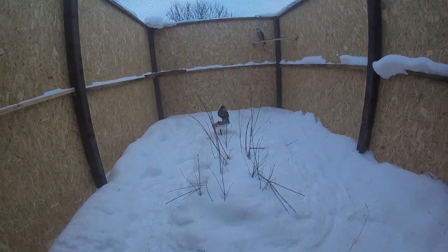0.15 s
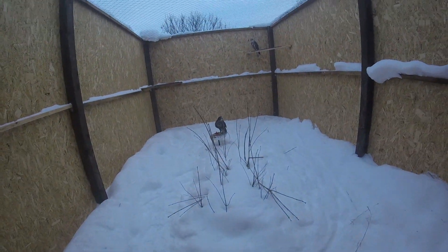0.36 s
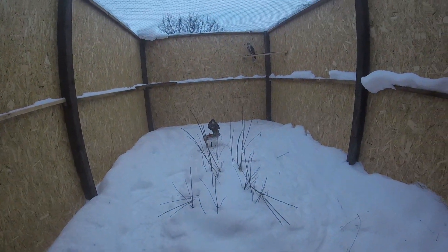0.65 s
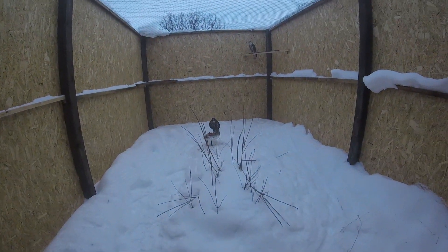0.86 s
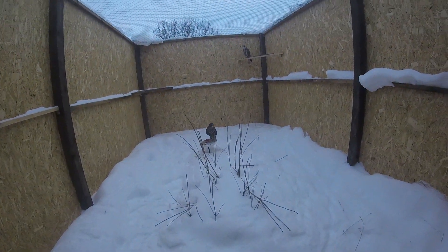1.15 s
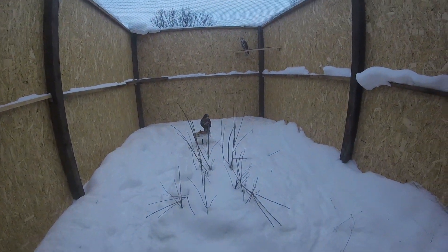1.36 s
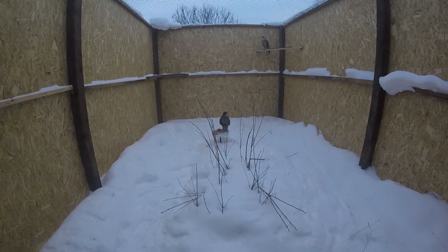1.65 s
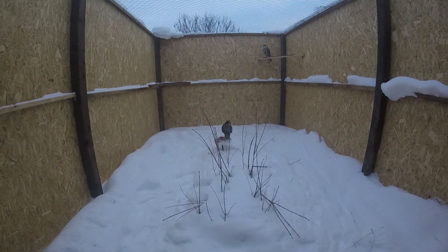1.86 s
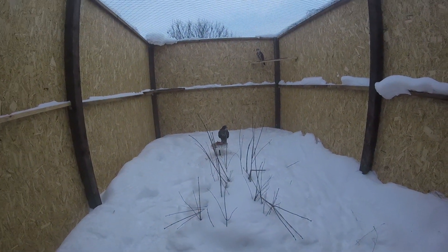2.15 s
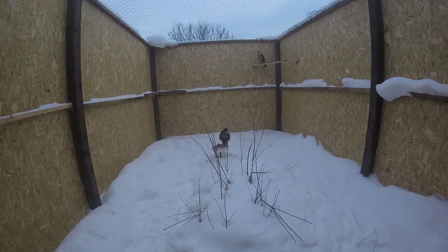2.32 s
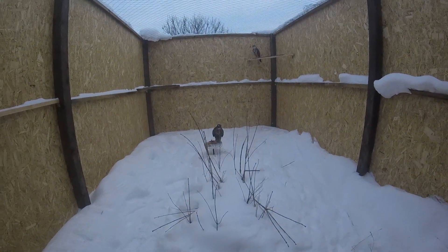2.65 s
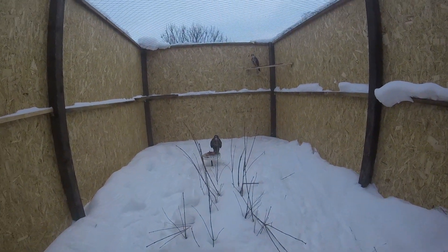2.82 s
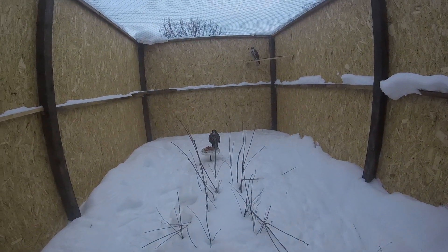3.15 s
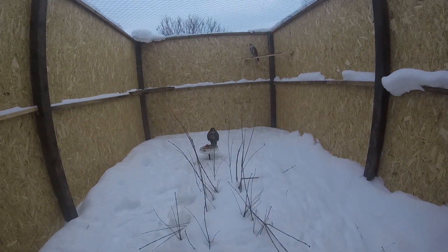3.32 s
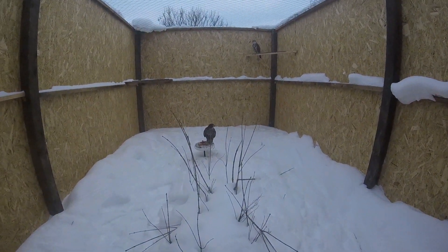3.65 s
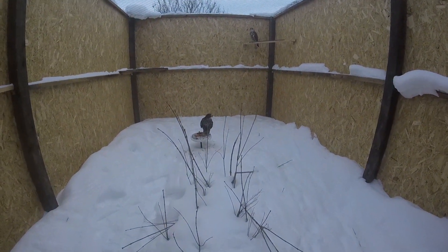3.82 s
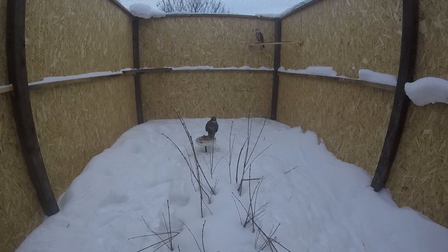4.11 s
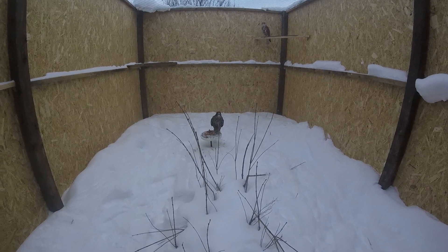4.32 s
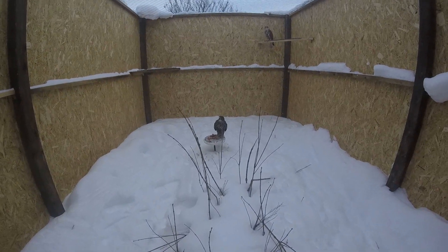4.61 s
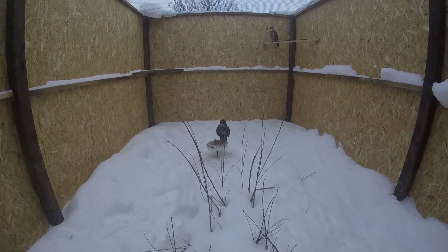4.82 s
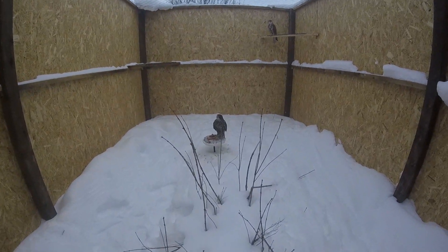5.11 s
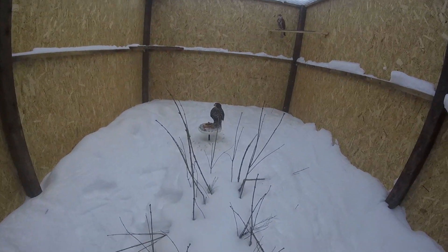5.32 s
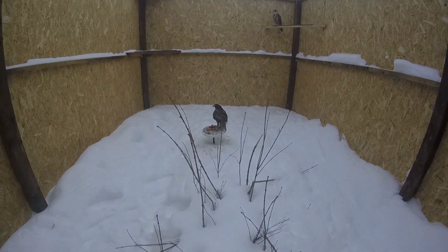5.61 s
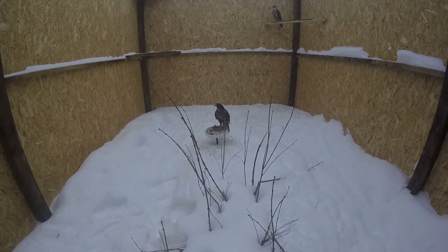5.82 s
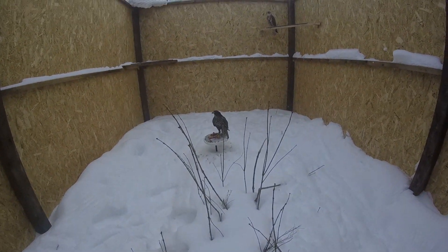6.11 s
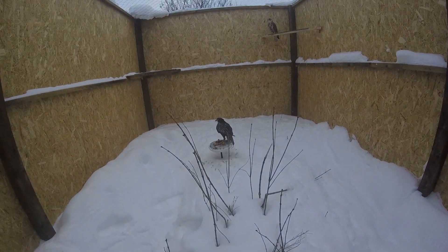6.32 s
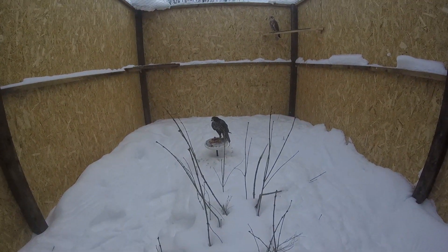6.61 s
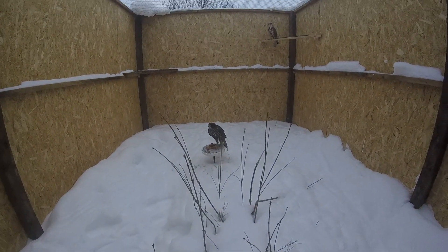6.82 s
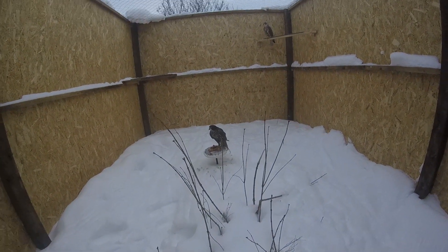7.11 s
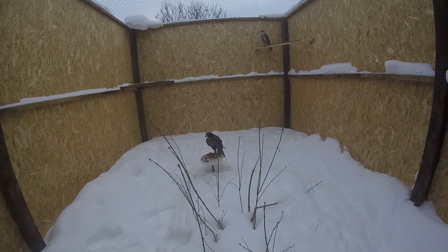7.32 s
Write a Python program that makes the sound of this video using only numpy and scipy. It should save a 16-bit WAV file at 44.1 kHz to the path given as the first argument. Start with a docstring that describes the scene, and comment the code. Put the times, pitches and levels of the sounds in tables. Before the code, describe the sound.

Hoarse, repeated falcon cries ring between wooden walls, then stop, leaving soft bumps and a few door clicks in quiet air.

```python
"""Falcon in a snowy aviary.

A falcon scolds between board walls under an open roof. Each call starts as a rising rasp, ragged
pulses of the syrinx through an opening beak, and breaks into a hoarse, arched cry; the walls ring
after it. Soft bumps and rustles sound close by, and at the end a door clicks over quiet winter air."""
import sys
import numpy as np
from scipy import signal
from scipy.fft import rfft, irfft, next_fast_len
from scipy.io import wavfile
from scipy.ndimage import map_coordinates

SR = 44100
rng = np.random.default_rng(int(sys.argv[2]) if len(sys.argv) > 2 else 0)


def to_wav(sig):
    """Store sig (one row per channel, or 1-D mono) as 16-bit WAV at the path in sys.argv[1].

    Samples outside -1..1 are clipped; the rate is SR.
    """
    pcm = np.clip(np.atleast_2d(sig), -1, 1) * 32767
    pcm = np.round(pcm).astype(np.int16)
    wavfile.write(sys.argv[1], SR, pcm.T)  # frames by channels


N = 329426


def amp(db):
    """Decibels to gain."""
    return 10 ** (np.asarray(db) / 20)


def unit(x):
    """Scale to rms 1."""
    return x / np.sqrt(np.mean(x ** 2) + 1e-20)


def along(points, hz):
    """Read (Hz, value) points on a log frequency axis."""
    knots_hz, values = np.transpose(points)
    return np.interp(np.log(hz + 1), np.log(knots_hz + 1), values)


def filtered(x, spectrum):
    """Filter x by a curve of (Hz, dB) points."""
    size = next_fast_len(len(x) + 4096)
    gain = amp(along(spectrum, np.fft.rfftfreq(size, 1 / SR)))
    return irfft(rfft(x, size) * gain, size)[:len(x)]


def coloured(x, spectrum):
    """Filter, then scale to rms 1."""
    return unit(filtered(x, spectrum))


def noise(n, spectrum):
    """Coloured noise of rms 1."""
    return coloured(rng.standard_normal(n), spectrum)


def wobble(n, rate_hz):
    """Smooth random curve with rate_hz knots a second."""
    knots = rng.standard_normal(int(n * rate_hz / SR) + 4)
    return map_coordinates(knots, [np.arange(n) * rate_hz / SR])


def add(track, start_s, x):
    """Mix x into the track, cut to fit."""
    i = round(start_s * SR)
    x = x[max(-i, 0):max(N - i, 0)]
    track[max(i, 0):][:len(x)] += x


def gate(t, start_s, end_s, rise_s, fall_s):
    """Smooth on-off envelope."""
    return (1 + np.tanh((t - start_s) / rise_s)) * (1 - np.tanh((t - end_s) / fall_s)) / 4


def burst(spectrum, rise_s, t60_s):
    """A short contact: noise that swells and dies, envelope peak 1."""
    t = np.arange(SR // 5) / SR
    envelope = (1 - np.exp(-t / rise_s)) ** 2 * amp(-60 * t / t60_s)
    return noise(len(t), spectrum) * envelope / envelope.max()


# Outdoor air spectrum. Each row: frequency in Hz, relative density in dB.
AIR_SPECTRUM = [(20, -1.5), (64, -6), (110, -3.5), (230, -9.5), (450, -13), (800, -20.5), (2000, -24),
                (5000, -31.5), (9000, -38), (15000, -47.5)]


def winter_air(level_db=-55.5, drift_db=1.5):
    """Still air with a faint, far rumble."""
    return amp(level_db + drift_db * wobble(N, 13)) * noise(N, AIR_SPECTRUM)


# Rubbing spectrum. Each row: frequency in Hz, relative density in dB.
RUSTLE_SPECTRUM = [(60, -11.5), (160, 1.5), (430, 0.5), (850, -14), (1800, -11.5), (3500, -20),
                   (6200, -22.5), (10000, -32), (15000, -45.5)]
# Spells of rustling. Each row: start in seconds, length in seconds, level in dB.
RUSTLE_SPELLS = [(2.393, 0.62, -49), (3.54, 1.25, -50.5), (6.6, 0.23, -57), (6.984, 0.22, -52)]


def rustle(grain_db=3, rise_s=0.027, settle_s=0.12):
    """Grainy rubbing close by: each spell rises, holds while the movement lasts and settles."""
    t = np.arange(N) / SR
    level = np.zeros(N)
    for start_s, length_s, db in RUSTLE_SPELLS:
        rise = 1 - np.exp(-np.maximum(t - start_s, 0) / rise_s)
        settle = np.exp(-np.maximum(t - start_s - length_s, 0) / settle_s)
        level = np.maximum(level, amp(db) * rise * settle)
    return level * unit(noise(N, RUSTLE_SPECTRUM) * amp(grain_db * wobble(N, 130)))


# Knock spectrum. Each row: frequency in Hz, relative density in dB.
BUMP_SPECTRUM = [(30, -24), (110, -5), (200, 0.5), (520, -1), (850, -17), (2000, -23), (8000, -34),
                 (15000, -59)]
# Knocks. Each row: time in seconds, relative level in dB.
BUMP_HITS = [(0.383, -31), (2.853, -29.5), (3.198, -30.5), (3.594, -28), (3.700, -21.5), (4.688, -36),
             (4.748, -32.5), (5.859, -42), (6.473, -36), (6.614, -35), (6.692, -39), (6.729, -38),
             (6.776, -34.5), (6.984, -33.5), (7.019, -38), (7.076, -34.5), (7.191, -33.5), (7.214, -35)]


def bumps(gain_db=-8.5):
    """Soft, low knocks close by."""
    track = np.zeros(N)
    for time_s, db in BUMP_HITS:
        add(track, time_s - 0.007, amp(db + gain_db) * burst(BUMP_SPECTRUM, rise_s=0.017, t60_s=0.086))
    return track


# Click and scrape spectra. Each row: frequency in Hz, relative density in dB.
CLICK_SPECTRUM = [(150, -4), (300, -10), (1000, -11), (1900, 2.5), (3100, -10.5), (3700, -9), (5400, -24),
                  (8000, -29.5), (14000, -57.5)]
SCRAPE_SPECTRUM = [(800, -14), (2000, -4), (6500, 2), (10000, -12.5), (15000, -25.5)]
# Door clicks. Each row: time in seconds, relative level in dB.
DOOR_CLICKS = [(5.8605, -50), (6.3884, -50), (6.4733, -44.5), (6.6103, -40), (6.6238, -27.5), (6.6682, -48),
               (6.699, -41), (6.7307, -41), (6.7768, -39), (6.8441, -26), (7.0772, -50), (7.1953, -40.5)]


def door(click_gain_db=-9.0, scrape_gain_db=-18, scrape_limit_db=-58.5):
    """Woody clicks, each with a bright scrape that grows with the blow up to a limit."""
    track = np.zeros(N)
    for time_s, db in DOOR_CLICKS:
        click = burst(CLICK_SPECTRUM, rise_s=0.0078, t60_s=0.027)
        scrape = burst(SCRAPE_SPECTRUM, rise_s=0.008, t60_s=0.051)
        add(track, time_s - 0.004, amp(db + click_gain_db) * click)
        add(track, time_s - 0.006, amp(min(db + scrape_gain_db, scrape_limit_db)) * scrape)
    return track


# Aviary decay. Each row: frequency in Hz, T60 in seconds.
WALL_T60 = [(200, 0.6), (1000, 0.42), (1900, 0.34), (2300, 0.36), (3200, 0.31), (5500, 0.3), (10000, 0.28),
            (15000, 0.35)]


def aviary(x, slaps_db=-5, tail_db=-4.5, build_s=0.014, slap_count=8):
    """Direct sound, slaps from the board walls and a tail that escapes through the open roof."""
    hz, t, bins = signal.stft(rng.standard_normal(SR * 3 // 5), SR, nperseg=256)
    decay = amp(-60 * t / along(WALL_T60, hz)[:, None])
    build = 1 - np.exp(-t / build_s)
    _, tail = signal.istft(bins * decay * build, SR, nperseg=256)
    response = amp(tail_db) * tail / np.linalg.norm(tail)
    slap_delays = (rng.uniform(0.001995, 0.03, slap_count) * SR).astype(int)
    response[slap_delays] += amp(slaps_db) / np.sqrt(slap_count)
    response[0] += 1
    heard = signal.fftconvolve(x, response)
    return heard * np.linalg.norm(x) / np.linalg.norm(heard)


def membrane(pitch_hz, jitter, jitter_hz):
    """Phase of the syrinx membrane, whose period trembles."""
    return 2 * np.pi * np.cumsum(pitch_hz * (1 + jitter * wobble(len(pitch_hz), jitter_hz))) / SR


def puffs(phase):
    """Turbulent air let through once a cycle."""
    return unit(rng.standard_normal(len(phase)) * (1 + 0.77 * np.cos(phase)))


def burr(t, rasp_s, pitch_hz=226):
    """A faint, low, trembling tone under the rasp."""
    phase = membrane(np.full(len(t), pitch_hz), jitter=0.037, jitter_hz=120)
    return np.sin(phase) * gate(t, 0.012, rasp_s - 0.02, rise_s=0.011, fall_s=0.043)


# Throat response at three beak openings. Each row: frequency in Hz, relative gain in dB.
BEAK_NEARLY_SHUT = [(2400, -1), (3800, -9.5), (5000, -3.5), (9000, -17.5)]
BEAK_HALF_OPEN = [(60, -51.5), (230, -23.5), (350, -26), (540, -14), (740, -16.5), (950, -26), (1400, -12),
                  (1850, -2), (2350, -10), (3100, -24), (3900, -14.5), (4600, -31), (5900, -26.5),
                  (6800, -39), (7900, -32), (10500, -44.5), (14000, -65.5)]
BEAK_WIDE_OPEN = [(60, -50.5), (250, -31.5), (680, -21.5), (900, -22.5), (1350, -20), (1950, 3.5),
                  (2900, -7), (3700, -10.5), (4300, -5.5), (5000, -14.5), (5900, -8.5), (7000, -26),
                  (10300, -26.5), (13000, -43), (15000, -47)]


def rasp(t, length_s, low_hz=550, high_hz=745, air_share=0.71, swell_db=10, flutter_db=1.6):
    """Low register: ragged pulses climb in pitch and level while the beak opens."""
    effort = np.clip(t / length_s, 0, 1)
    pitch_hz = (low_hz + (high_hz - low_hz) * effort ** 2.3) * (1 + 0.02506 * wobble(len(t), 40))
    tightening = 1 + 0.16 * (effort ** 2 - 0.4)
    phase = membrane(pitch_hz / tightening, jitter=0.04, jitter_hz=450)
    pulses = unit(sum(np.cos(k * phase) for k in range(1, 19)))
    source = np.sqrt(1 - air_share) * pulses + np.sqrt(air_share) * puffs(phase)
    source *= amp(flutter_db * wobble(len(t), 452.6))
    gape = 0.19 * effort ** 3
    voice = (1 - gape) * coloured(source, BEAK_HALF_OPEN) + gape * coloured(source, BEAK_WIDE_OPEN)
    voice = map_coordinates(voice, [np.cumsum(tightening)])  # all throat resonances slide up together
    shut = np.exp(-t / 0.035)
    voice = (1 - shut) * voice + shut * filtered(voice, BEAK_NEARLY_SHUT)
    swell = amp(swell_db * (effort - 1))
    return voice * swell * gate(t, 0, length_s + 0.0032, rise_s=0.0069, fall_s=0.011)


# Harmonics of the cry. Each row: multiple of the pitch, relative level in dB.
CRY_HARMONICS = [(1, -17.5), (2, 0), (3, -10), (4, -11), (5, -17.5), (6, -31.5), (7, -27), (8, -36.5),
                 (9, -35)]


def cry(t, start_s, end_s, top_hz, pitch_arch=0.085, hoarse_db=-3.5, flutter_db=1.1, gape_db=4.0):
    """High register: an arched tone in hoarse noise, its second harmonic on the throat resonance."""
    from_top = np.clip((2 * t - start_s - end_s) / (end_s - start_s), -1.5, 1.5)
    phase = membrane(top_hz * (1 - pitch_arch * from_top ** 2), jitter=0.02, jitter_hz=520)
    gape = amp(-gape_db * from_top ** 2)  # widest, so brightest, at the top of the arch
    tone = unit(sum(amp(db) * np.sin(k * phase) * (gape if k > 2 else 1) for k, db in CRY_HARMONICS))
    tone *= gate(t, start_s + 0.00073, end_s - 0.002, rise_s=0.01, fall_s=0.024)
    air = puffs(phase)
    hoarse = gape * coloured(air, BEAK_WIDE_OPEN) + 0.87 * (1 - gape) * coloured(air, BEAK_HALF_OPEN)
    hoarse *= gate(t, start_s + 0.0055, end_s + 0.004, rise_s=0.011, fall_s=0.0046)
    flutter = unit(amp(flutter_db * wobble(len(t), 333.4)))
    return flutter * (tone + amp(hoarse_db) * hoarse)


# Falcon calls. Each row: start in seconds, rasp length in seconds, cry length in seconds,
# top pitch in Hz, relative cry level in dB.
CALLS = [(-0.13, 0.099, 0.068, 1153, -16.5), (0.167, 0.073, .067, 1106, -15.5),
         (0.46, .09, 0.07, 1171, -15), (0.749, 0.081, 0.085, 1166, -16), (1.048, 0.09, .068, 1166, -15.5),
         (1.35, .097, .074, 1084, -15), (1.758, .15, 0.048, 1082, -14.5), (2.203, 0.15, 0.06, 1106, -15.5),
         (2.602, 0.12, 0.057, 1134, -13.5), (2.953, 0.11, 0.062, 1118, -14.5),
         (3.339, .133, .051, 1134, -15), (3.724, 0.12, .061, 1062, -16), (4.097, 0.12, 0.059, 1125, -15),
         (4.464, .12, 0.067, 1123, -15), (4.859, 0.14, 0.063, 1054, -15.5)]


def falcon(cry_gain_db=2.4, usual_rasp_s=0.12, usual_top_hz=1109,
           body_db_per_s=0.27, burr_db_per_s=3.0, bright_db_per_hz=0.0461):
    """A run of scolding calls, rasp then cry; the voice gains low body and burr as it goes on."""
    track = np.zeros(N)
    t = np.arange(SR // 3) / SR
    for start_s, rasp_s, cry_s, top_hz, cry_db in CALLS:
        rasp_db = -18 - 47 * (rasp_s - usual_rasp_s)  # a drawn-out rasp is softer
        call = amp(rasp_db) * rasp(t, rasp_s)
        call += amp(cry_db + cry_gain_db) * cry(t, rasp_s, rasp_s + cry_s, top_hz)
        body_db = body_db_per_s * (start_s - 2.8)  # flat at mid-run
        bright_db = bright_db_per_hz * (top_hz - usual_top_hz)  # a higher call is pressed harder
        call = filtered(call, [(800, body_db), (1100, 0), (2400, 0), (3200, bright_db)])
        call += amp(-55 + burr_db_per_s * start_s) * burr(t, rasp_s)
        add(track, start_s, aviary(call))  # each call draws its own random wall reflections
    return track


def scene():
    """All sources in mono."""
    return (falcon() + bumps() + door() + rustle() + winter_air())[None]


def record(dry, ceiling=0.97, cutoff_hz=15250):
    """Soft peak limiter, then a brick-wall low-pass."""
    limited = dry / (1 + np.abs(dry / ceiling) ** 6) ** (1 / 6)
    size = next_fast_len(N + SR // 2)
    passband = np.fft.rfftfreq(size, 1 / SR) < cutoff_hz
    return irfft(rfft(limited, size) * passband, size)[..., :N]


dry = scene()
out = record(dry)
to_wav(out)
```